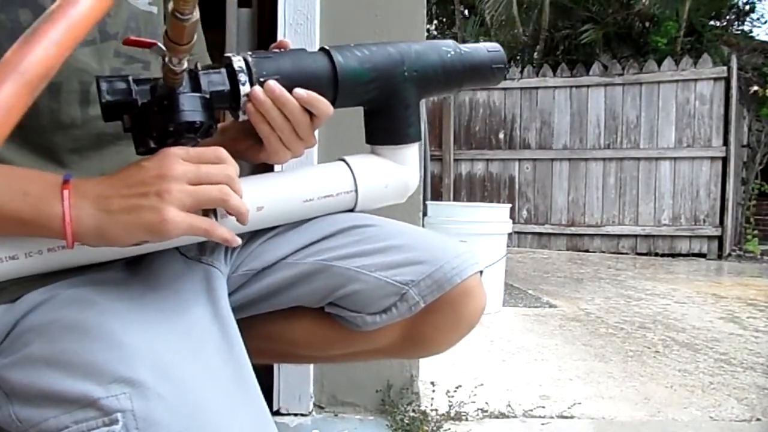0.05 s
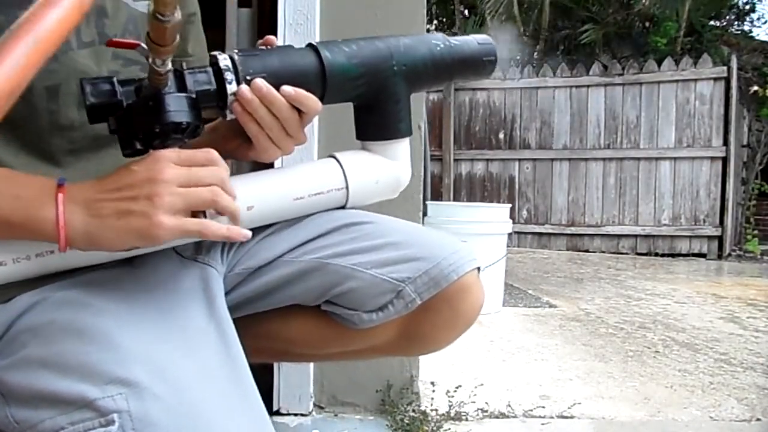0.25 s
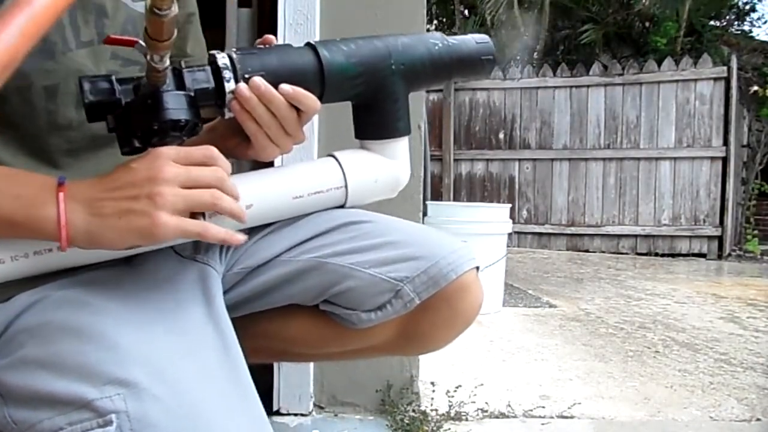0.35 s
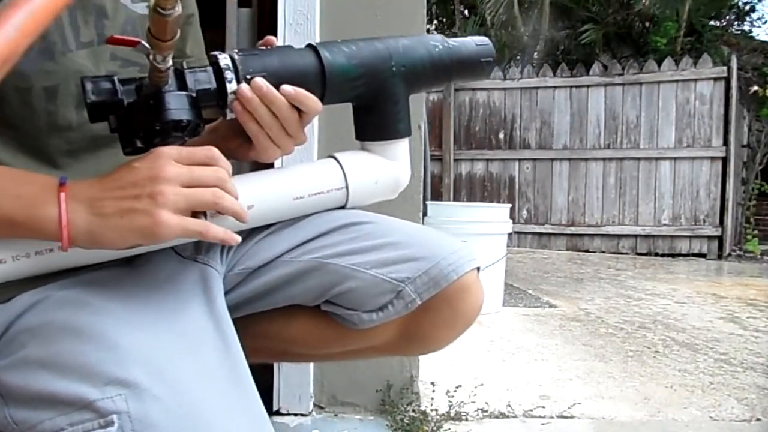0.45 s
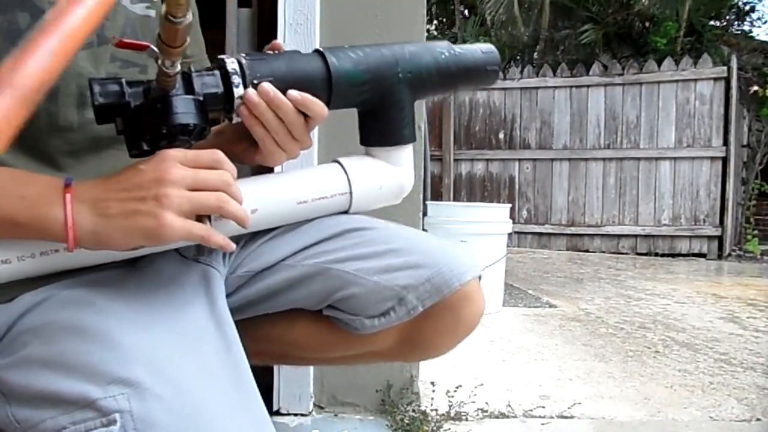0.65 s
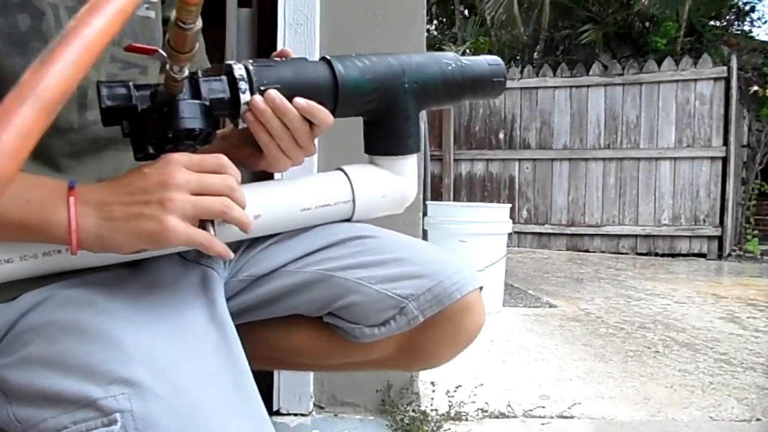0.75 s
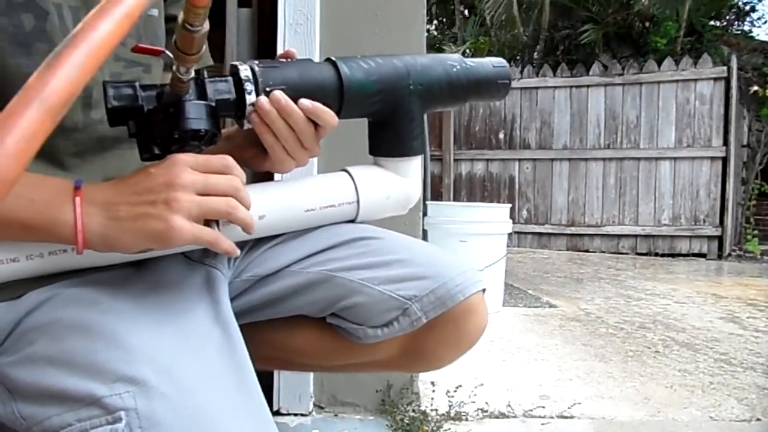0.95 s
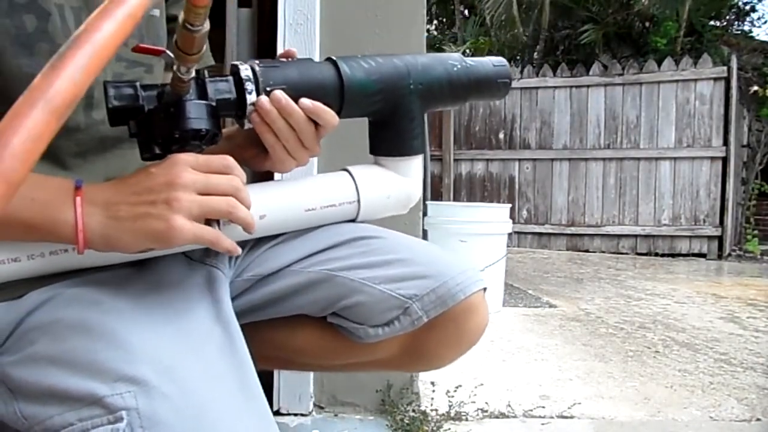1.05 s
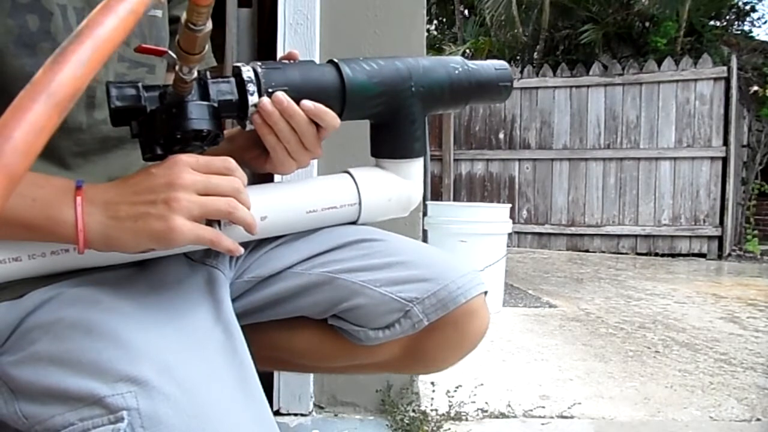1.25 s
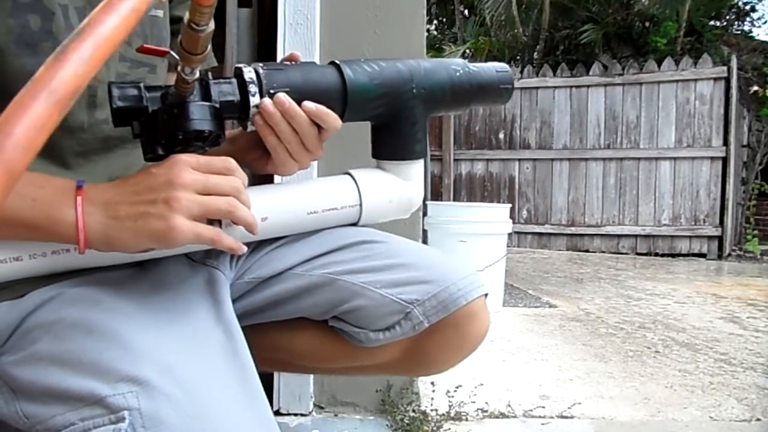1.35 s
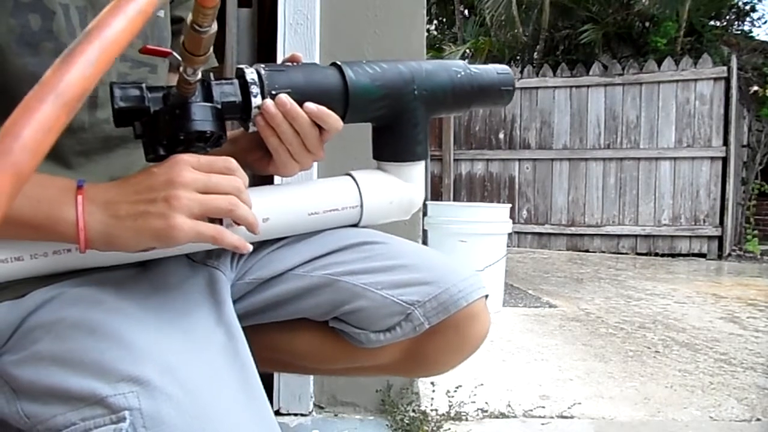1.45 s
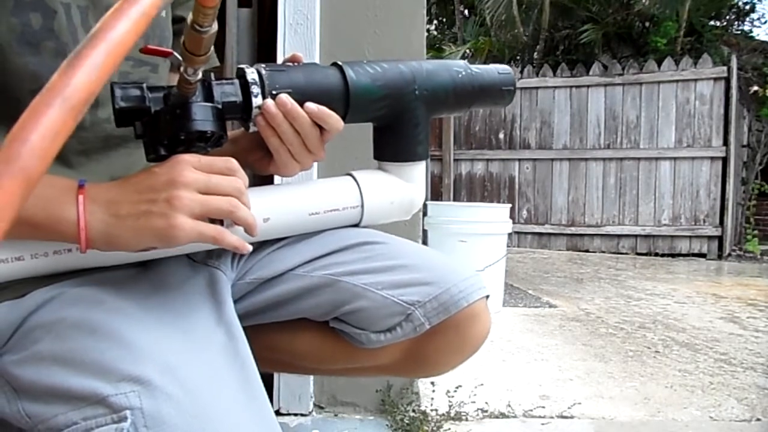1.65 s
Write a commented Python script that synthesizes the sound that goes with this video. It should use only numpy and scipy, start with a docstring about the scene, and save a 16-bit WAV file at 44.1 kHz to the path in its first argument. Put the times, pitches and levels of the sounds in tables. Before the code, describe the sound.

One sharp pop from a compressed air cannon, then a soft leaking hiss in a yard.

```python
"""A concrete yard, where a homemade air cannon fires close to a camera. The valve squeals open, the
muzzle pops and blasts, pipe resonances and wall reflections ring out, and a leak hisses on over a
distant machine hum. The camera's gain control ducks hard at the shot, holds, then lets hiss and
hum swell back."""
import sys
import numpy as np
from scipy import signal
from scipy.fft import rfft, irfft
from scipy.io import wavfile
from scipy.ndimage import uniform_filter1d

SR = 44100
rng = np.random.default_rng(int(sys.argv[2]) if len(sys.argv) > 2 else 0)


def output_pcm(signal):
    """Save a mono or channel-first signal as 16-bit PCM at the path in sys.argv[1].

    Samples are clipped to [-1, 1] before scaling.
    """
    pcm = np.clip(np.atleast_2d(signal).T, -1, 1) * 32767
    wavfile.write(sys.argv[1], SR, np.round(pcm).astype(np.int16))


N = 74970

# Likeness of the two microphones for the shot and for the steady sounds.
# Each row: frequency in Hz, left-right correlation.
SHOT_COHERENCE = [(60, 0.78), (130, 1), (290, 1), (630, 0.97), (1390, 0.94), (3040, 0.93), (4200, .93),
                  (5400, 0.52), (6680, 0.3), (9000, -.4), (14600, -0.6)]
STEADY_COHERENCE = [(60, 0.99), (180, 0.98), (540, 0.96), (1620, 0.94), (4880, 0.67), (14600, 0.13)]
SHOT_LAG_S, STEADY_LAG_S = 8e-6, -8.4e-6  # right behind left for the shot, right ahead of left for the steady sounds
BLAST_S = 0.238


def amp(db):
    return 10 ** (np.asarray(db) / 20)


def unit_rms(x):
    return x / np.sqrt(np.mean(x ** 2) + 1e-20)


def at_frequency(points, hz):
    knots_hz, values = np.transpose(points)
    return np.interp(np.log(hz + 1), np.log(knots_hz + 1), values)


def since(start_s):
    return np.maximum(np.arange(N) / SR - start_s, 0)


def envelope(curve):
    times, db = np.transpose(curve)
    return amp(np.interp(since(0), times, db, left=-200, right=-200))


def noise_pair(coherence, lag_s):
    """Partial coherence: two microphones share part of a white noise, with a time lag."""
    hz = np.fft.rfftfreq(N, 1 / SR)
    left, independent = rfft(rng.standard_normal((2, N)))
    shared = np.clip(at_frequency(coherence, hz), -1, 1)
    right = (shared * left + np.sqrt(1 - shared ** 2) * independent) * np.exp(-2j * np.pi * hz * lag_s)
    return irfft(np.array([left, right]), N)


def colour(x, spectrum):
    """Spectral shaping to unit RMS, rolling off below the first point."""
    hz = np.fft.rfftfreq(N, 1 / SR)
    low_cut = np.minimum(hz / spectrum[0][0], 1) ** 2
    return unit_rms(irfft(rfft(x) * amp(at_frequency(spectrum, hz)) * low_cut, N))


def resonate(x, hz, width):
    """Resonance: two cascaded two-pole filters pass one band, scaled to unit RMS."""
    radius = np.exp(-np.pi * width / SR)
    poles = [1, -2 * radius * np.cos(2 * np.pi * hz / SR), radius * radius]
    return unit_rms(signal.lfilter([1, 0, -1], poles, signal.lfilter([1, 0, -1], poles, x)))


def muzzle():
    """Sudden discharge radiates jet turbulence, rarefaction pops and a few cycles of barrel resonance."""
    # Jet envelope. Each row: time in seconds, level in dB.
    jet_levels = [(.218, -37), (.221, 3.5), (.229, 3), (.234, 0.5), (.237, 6.5), (.2395, 0.5), (.242, -5),
                  (.244, 4), (.25, 4.5), (.258, -1.5), (.29, -12), (.36, -31)]
    # Jet spectrum. Each row: frequency in Hz, relative density in dB.
    jet_spectrum = [(290, -29.5), (500, -2), (878, -8.5), (1150, -8), (1750, -10), (3120, -7),
                    (4200, -15.5), (5110, -8.5), (5970, -9), (9640, -8), (14500, -15.5)]
    # Suction pulses. Each row: start in seconds, strength in dB, width in seconds.
    pops = [(0.2204, 14, 0.0006), (0.2358, 16.5, 0.001), (0.2421, 19, 0.00062), (0.248, 9.5, 0.00076),
            (0.2501, 14.5, .0009), (0.2578, 6, .0006), (.26, 12, .0007)]
    air = envelope(jet_levels) * colour(noise_pair(SHOT_COHERENCE, SHOT_LAG_S), jet_spectrum)
    for start, db, width in pops:
        age = since(start) / width
        air -= amp(db) * age ** 2 * (1 - age / 3.9) * np.exp(2 - 2 * age)
    barrel_hz, hold_s, fade_s = 610, 0.0025, 0.00092
    t = since(BLAST_S)
    fade = 1 / (1 + np.exp(np.minimum((t - hold_s) / fade_s, 50)))
    return air + amp(19) * fade * np.sin(2 * np.pi * barrel_hz * t * (1 + 1.6 * t))


def valve():
    """Flow through a constriction: the opening valve spits and whistles, each band flaring briefly."""
    # Squeal envelope. Each row: time in seconds, level in dB.
    squeal_levels = [(.192, -73), (.197, -45), (.203, -29), (.208, -14.5), (.214, 2), (.2195, 7),
                     (.2215, -2), (.228, -25)]
    # Each row: centre in Hz, width in Hz, relative level in dB, time of flare in seconds.
    whistles = [(3970, 480, -2, .219), (4326, 650, -8, .21), (5160, 900, -12.5, .218),
                (6750, 780, -3, .2145), (7820, 700, -7, .218), (10050, 970, -10, .21),
                (11900, 600, 0, .208), (1810, 2200, -24.5, .214)]
    # Rough air round the whistles. Each row: frequency in Hz, relative density in dB.
    spit_spectrum = [(2500, -31), (3600, -8), (4400, -2), (6000, -5.5), (11000, 0), (12500, -10),
                     (14000, -20.5)]
    flare_db, flare_s = 7, 0.0016
    noise, t = noise_pair(SHOT_COHERENCE, SHOT_LAG_S), since(0)
    bands = sum(amp(db + flare_db * np.exp(-((t - moment) / flare_s) ** 2)) * resonate(noise, hz, width)
                for hz, width, db, moment in whistles)
    return envelope(squeal_levels) * (bands / 2.7 + amp(-9) * colour(noise, spit_spectrum))


def cracks():
    """Transients in the jet: very short bursts of band noise are heard as sharp cracks."""
    # Each row: start in seconds, level in dB, centre in Hz, width in Hz.
    bursts = [(0.219, -4, 2200, 2500), (0.2232, 6, 2500, 2500), (.2368, 4.5, 5400, 3010),
              (0.238, 6.5, 8200, 2500), (0.2438, 5, 9500, 3500), (0.2457, 11, 3000, 1400),
              (0.2473, 5.5, 6500, 3016), (.287, -4, 2540, 3500)]
    rise_s = 0.0008
    noise = noise_pair(SHOT_COHERENCE, SHOT_LAG_S)
    sound = 0
    for start, db, hz, width in bursts:
        age = since(start) / rise_s
        sound += amp(db) * age * np.exp(1 - age) * resonate(noise, hz, width)
    return sound


def pipes():
    """Air-column resonance: the dying rush of air excites the broad modes of chamber and barrel."""
    # Each row: centre in Hz, width in Hz, relative level in dB, 60 dB decay time in seconds.
    modes = [(135.4, 65, -7, .4), (204.4, 11, -23.5, 0.89), (181, 40, -3.5, 0.11), (275, 60, -7, .3),
             (331, 54, -0.5, 0.34), (389.5, 56, -4.5, .4), (452, 40, -0.5, 0.31), (530, 60, -7, 0.25),
             (670, 60, -4, 0.23), (735, 40, -17.5, 0.2), (977, 70, -12.5, .3)]
    noise, t = noise_pair(SHOT_COHERENCE, SHOT_LAG_S), since(BLAST_S)
    ringing = sum(amp(db - 60 * t / t60) * resonate(noise, hz, width) for hz, width, db, t60 in modes)
    return amp(-1) * (1 - np.exp(-t / 0.002)) * ringing


def heave():
    """Damped response: the pressure drop shoves the microphones, which swing back and settle."""
    left_right_db, settle_s = [[14.5], [6.5]], 0.053
    t = since(0.2425)
    age = t / settle_s
    swing = -(1 - np.exp(-t / 0.0089)) * np.exp(-age) * (1 - 2 * age + age ** 2 / 2)
    return amp(left_right_db) * swing


def yard(shot):
    """Reverberation: dense reflections from walls and fence die away at a rate set by frequency."""
    # Each row: frequency in Hz, 60 dB decay time in seconds.
    decay_times = [(100, 0.36), (260, 0.44), (700, 0.3), (1840, 0.38), (4850, 0.29), (12800, 0.4)]
    build_up = np.minimum(since(0.0019) / 0.0055, 1)
    reflections = (noise_pair(SHOT_COHERENCE, SHOT_LAG_S) * build_up)[:, :SR // 2]
    hz, t, bands = signal.stft(reflections, SR, nperseg=256)
    decay = amp(-60 * t / at_frequency(decay_times, hz)[:, None])
    tail = signal.istft(bands * decay, SR, nperseg=256)[1]
    return signal.fftconvolve(shot.mean(0)[None], tail / np.linalg.norm(tail[0]), axes=1)[:, :N]


def leak():
    """Turbulent escape: hiss and faint whistles ease as pressure falls; one region steps up later."""
    # Each row: frequency in Hz, relative density in dB.
    hiss_spectrum = [(590, -39.5), (1000, -7), (1400, -15), (1540, -5), (1800, -11.5), (3620, -9),
                     (4330, -13.5), (5060, -3.5), (7130, -10), (8710, -4.5), (10600, -9.5), (12200, -5),
                     (14200, -10.5)]
    # Whistles, then the bands that step up. Each row: centre in Hz, width in Hz, starting level in dB.
    whistles = [(1518, 60, -67), (3687, 120, -70), (6670, 200, -62), (8800, 60, -68.5), (8300, 84, -75),
                (9200, 50, -69.5), (12130, 100, -68)]
    stepping_bands = [(4955, 70, -67.5), (5110, 430, -71), (5600, 210, -69.5), (5997, 230, -69)]
    step_s, step_db, sag_db_per_s = 1.075, 9, 1.5
    noise = noise_pair(STEADY_COHERENCE, STEADY_LAG_S)
    hiss = amp(-44.5) * colour(noise, hiss_spectrum)
    hiss += sum(amp(db) * resonate(noise, hz, width) for hz, width, db in whistles)
    step = amp(step_db * np.minimum(since(step_s) / 0.015, 1))
    hiss += step * sum(amp(db) * resonate(noise, hz, width) for hz, width, db in stepping_bands)
    t = since(0.26)
    return hiss * np.minimum(t / 0.061, 1) * amp(-sag_db_per_s * t)


def outdoors():
    """Narrow-band noise wavers in amplitude: a distant machine hums over a low ambient wash."""
    # Each row: frequency in Hz, relative density in dB.
    wash_spectrum = [(25, -13), (44, -5), (70, -3.5), (220, -24.5), (700, -26.5), (1200, -35),
                     (1900, -41.5), (4000, -44.5), (8000, -50.5), (14200, -58)]
    # Each row: centre in Hz, width in Hz, level in dB.
    hum_bands = [(55.6, 4.7, -51), (82.5, 4.4, -48), (72, 12, -51.5), (269, 5.1, -63.5), (527, 20, -66.5)]
    noise = noise_pair(STEADY_COHERENCE, STEADY_LAG_S)
    hum = sum(amp(db) * resonate(noise, hz, width) for hz, width, db in hum_bands)
    return amp(-43.5) * colour(noise, wash_spectrum) + hum


def scene():
    """Superposition: shot, reflections, leak, heave and background add at the microphones."""
    shot = valve() + muzzle() + cracks() + pipes()
    balance = amp([[-0.25], [0.25]])
    near = (shot + amp(-11.5) * yard(shot) + leak()) * balance
    return near + heave() + outdoors()


def record(dry):
    """Automatic gain control: overload ducks the gain, which holds past the loudest moment and recovers."""
    trip_db, depth_db = -25, 21.5
    attack_s, hold_s, release_s = 0.0076, 0.57, 0.27
    mid = dry.mean(0)
    treble = signal.lfilter([1, -1], [1, -0.9], mid)
    treble_power = signal.lfilter(np.ones(200) / 200, 1, treble ** 2)
    trip_s = np.argmax(treble_power > amp(trip_db) ** 2) / SR
    loudest_s = np.argmax(uniform_filter1d(mid ** 2, size=300)) / SR
    attack = 1 - np.exp(-since(trip_s) / attack_s)
    release = np.exp(-since(loudest_s + hold_s) / release_s)
    ducked = dry * amp(-depth_db * attack * release)
    saturated = ducked / (1 + ducked ** 6) ** (1 / 6)  # peaks round off near full scale
    low_pass = signal.firwin(1023, cutoff=14220, window=("kaiser", 9), fs=SR)
    return signal.oaconvolve(saturated, low_pass[None], "same")


dry = scene()
out = record(dry)
output_pcm(out)
```